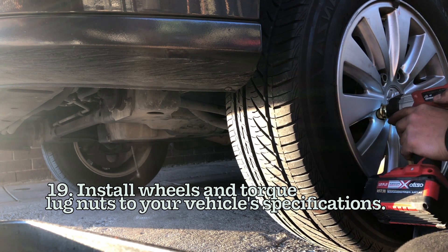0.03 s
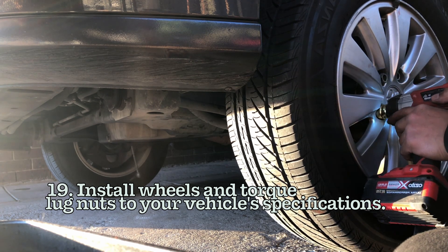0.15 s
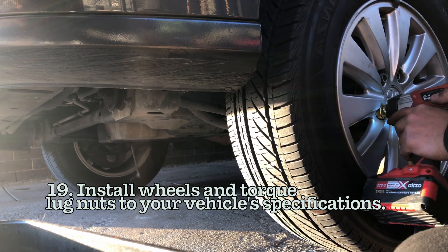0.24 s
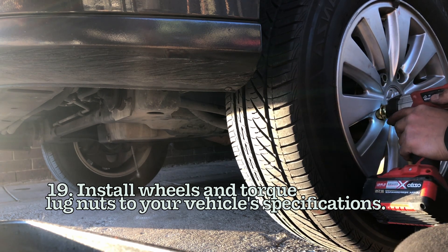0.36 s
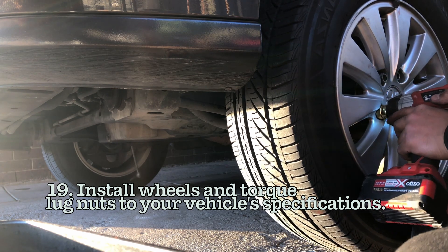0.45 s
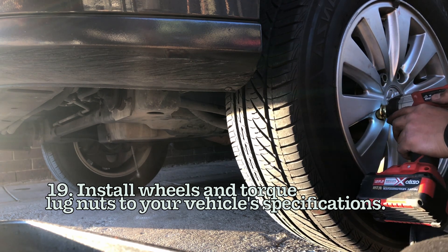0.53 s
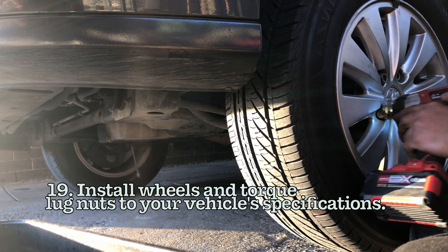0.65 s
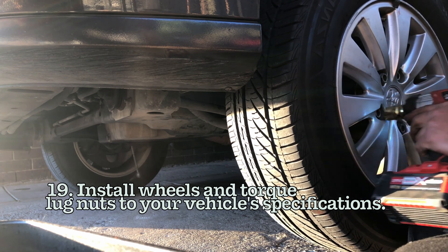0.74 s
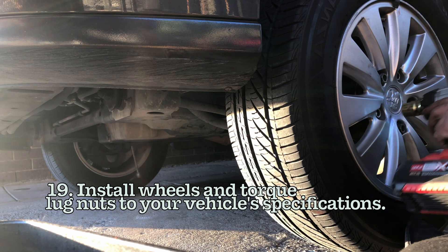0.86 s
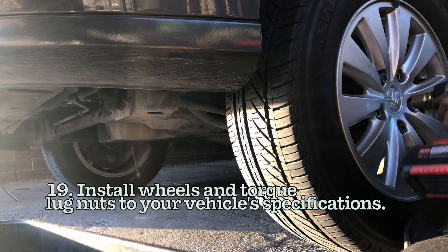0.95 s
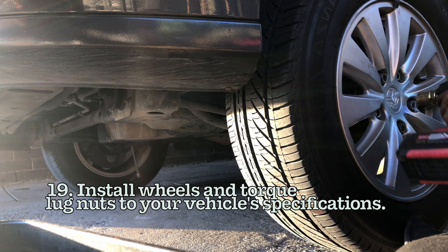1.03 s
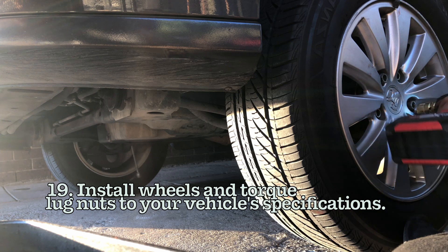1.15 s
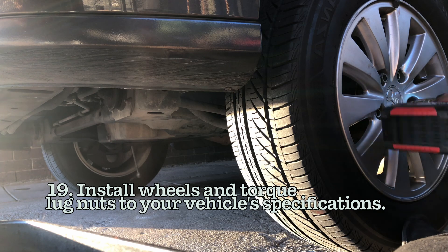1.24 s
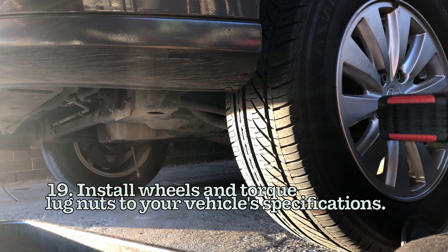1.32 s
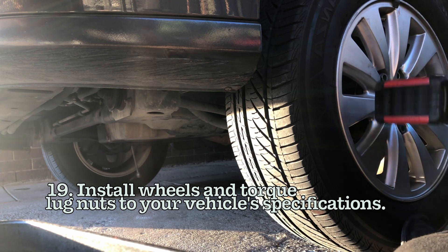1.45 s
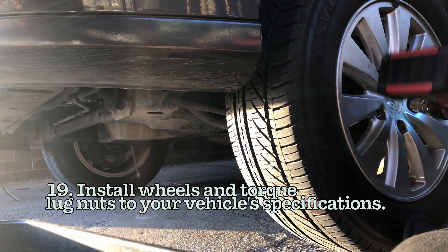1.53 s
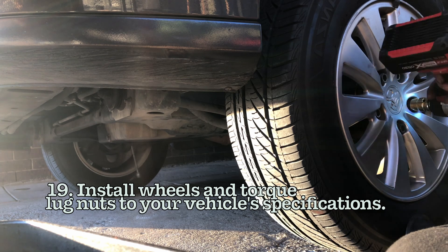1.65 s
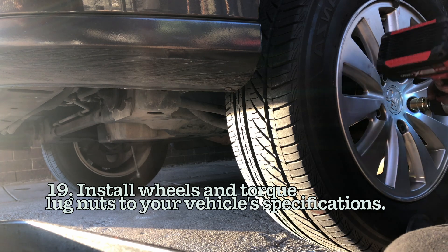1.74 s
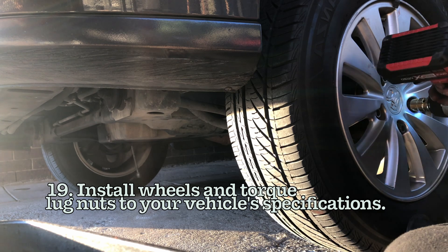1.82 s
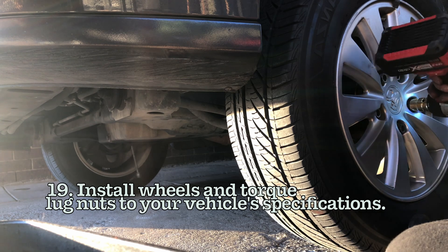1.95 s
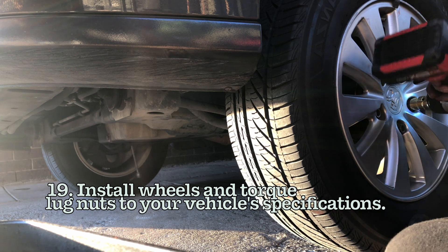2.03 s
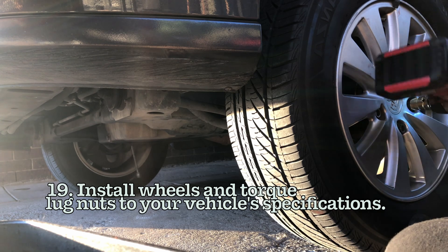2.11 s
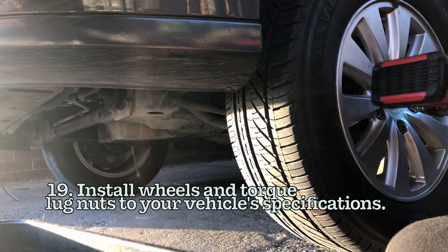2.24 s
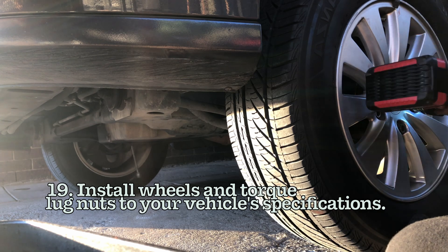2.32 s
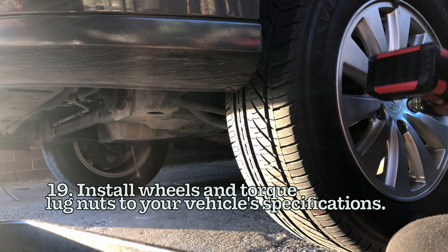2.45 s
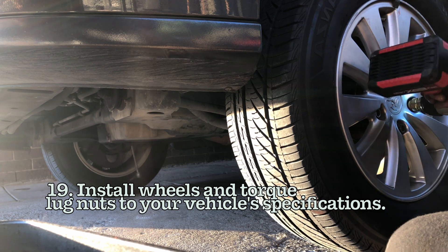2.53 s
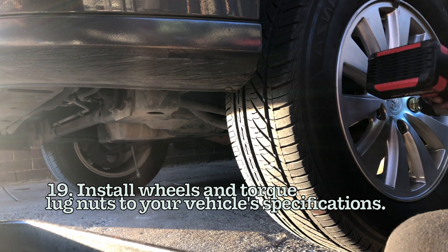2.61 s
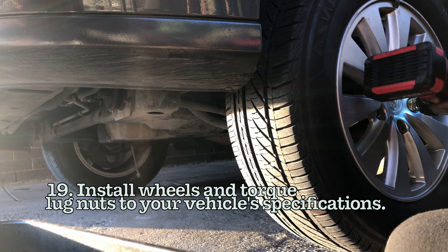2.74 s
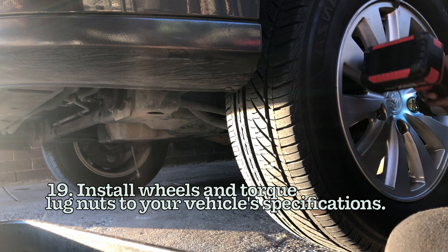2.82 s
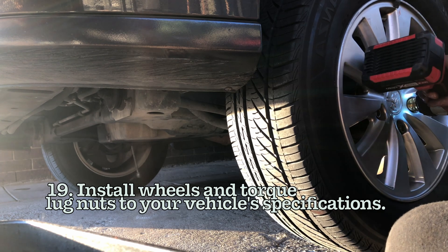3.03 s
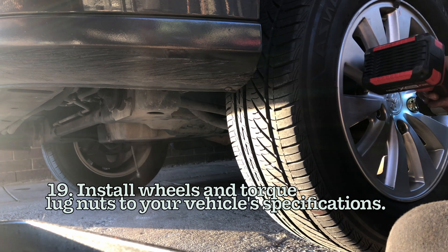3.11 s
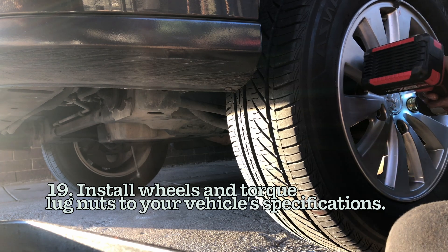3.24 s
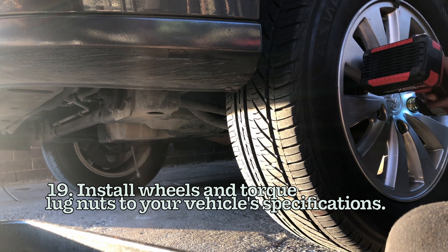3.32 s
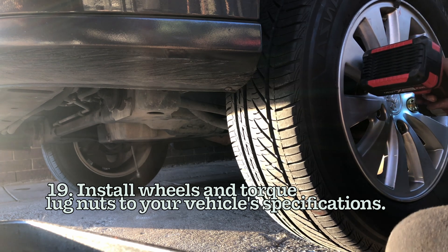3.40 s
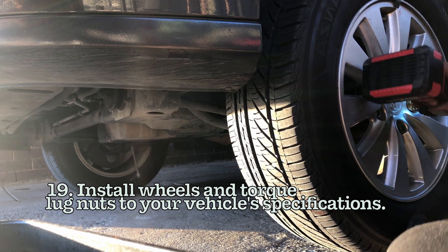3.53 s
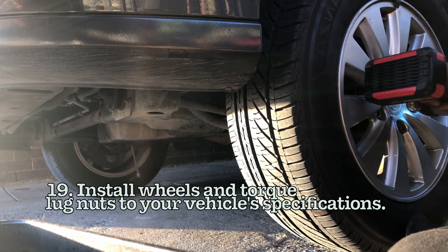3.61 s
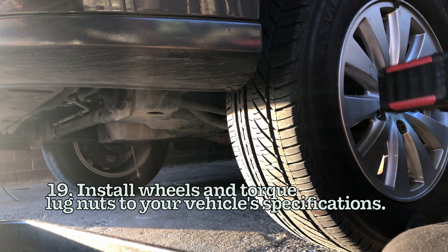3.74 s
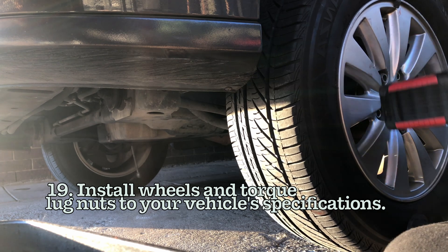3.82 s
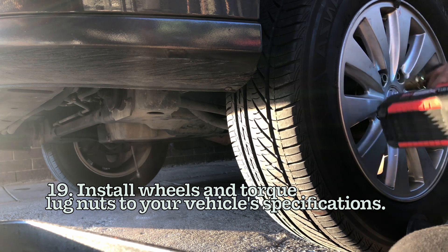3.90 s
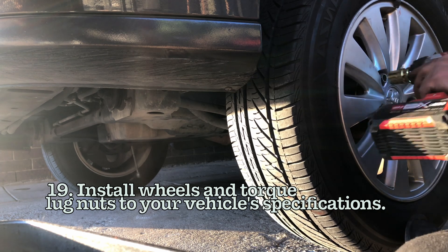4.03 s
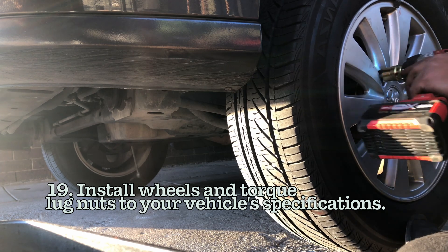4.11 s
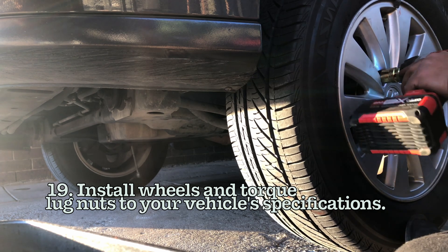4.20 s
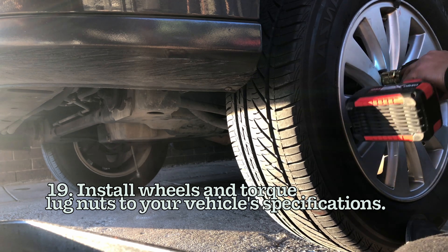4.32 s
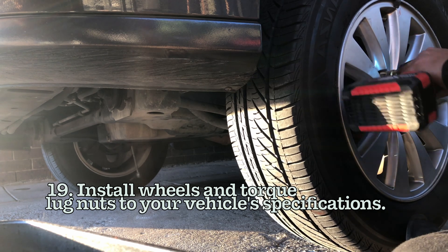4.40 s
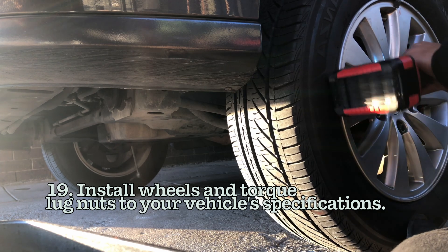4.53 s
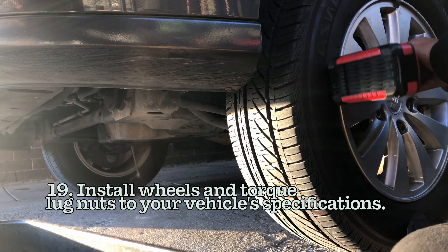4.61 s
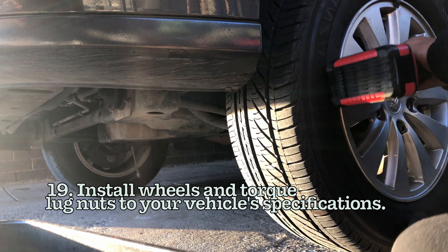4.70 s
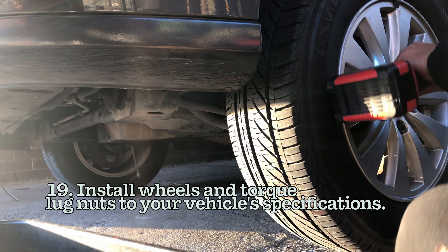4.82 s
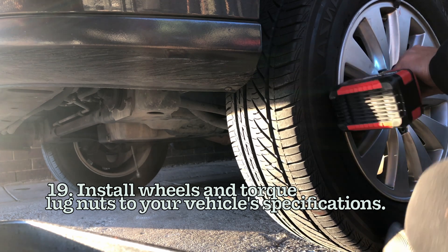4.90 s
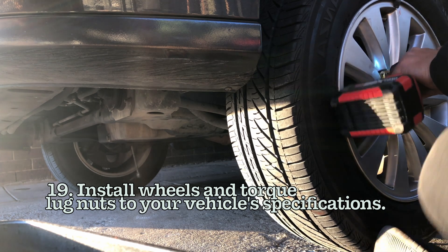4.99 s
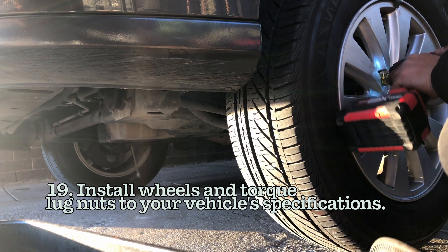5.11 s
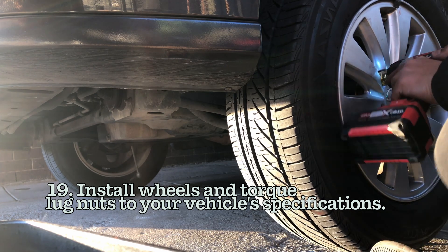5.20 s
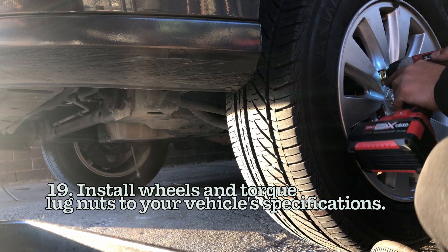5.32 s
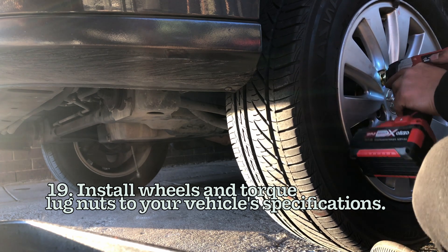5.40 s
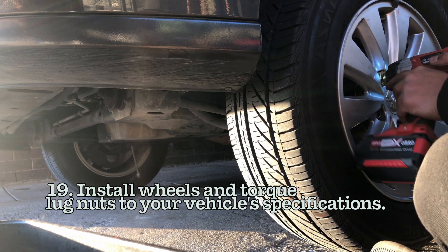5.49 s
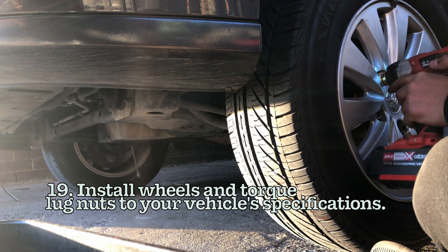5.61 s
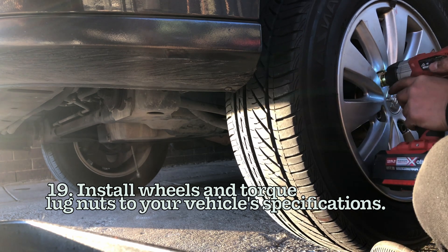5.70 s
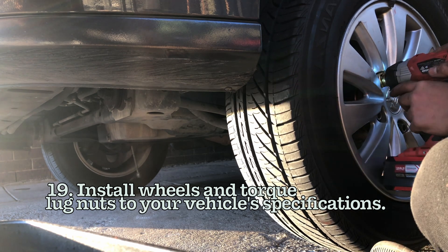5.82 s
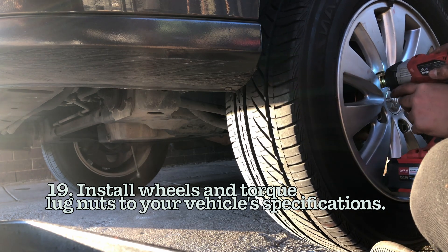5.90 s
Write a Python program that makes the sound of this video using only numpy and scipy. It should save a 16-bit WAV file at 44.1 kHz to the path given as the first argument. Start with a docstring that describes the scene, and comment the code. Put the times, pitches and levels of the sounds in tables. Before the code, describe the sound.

Three rapid, rattling bursts from a cordless impact driver on wheel nuts, separated by small metal clicks and rising motor whirs.

```python
"""A cordless impact driver tightens three wheel nuts in a garage, near a mono microphone.
The motor and gears whine up and the loose socket rattles on the nut; then the hammer strikes its anvil
about 59 times a second, exciting the resonances of tool and wheel. Some blows set off a low falling chirp.
Between nuts the socket clicks off and on. The garage reverberates over a faint rumble and hum."""
import sys
import numpy as np
from scipy import signal
from scipy.fft import rfft, irfft
from scipy.io import wavfile
from scipy.ndimage import uniform_filter1d

SR = 44100
rng = np.random.default_rng(int(sys.argv[2]) if len(sys.argv) > 2 else 0)


def int16_out(signal):
    """Quantize to a 16-bit WAV file."""
    q = np.round(np.clip(np.atleast_2d(signal).T, -1, 1) * 32767)
    wavfile.write(sys.argv[1], SR, q.astype(np.int16))


N = 262395
TIME = np.arange(N) / SR

# spectrum of a hard steel impact: frequency_hz, gain_db
IMPACT_SPECTRUM = [(70, -40), (130, -23.5), (260, -16), (400, -13), (600, -11.5), (1050, -9), (1450, -10),
                   (2100, -5.5), (2450, -2.5), (3500, -5.5), (4400, -6), (8000, -4), (12500, -3),
                   (15000, -2), (16000, -5.5)]
# spectrum of a light metal contact: frequency_hz, gain_db
CLICK_SPECTRUM = [(120, -21.5), (200, -2), (440, -10.5), (836, -11.5), (1560, -8.5), (1870, -2),
                  (2130, -6.5), (2800, -3), (3620, -9.5), (4270, -8.5), (7010, -11.5), (10100, -10),
                  (16000, -25)]


def hammer(blow_rates, blow_db, tilt_db, lift_s=.004, jitter_s=.00005, likeness=.3, light_grip_db=-38):
    """Impact excitation: the hammer knocks up its cam, then crashes on the anvil; the wheel's modes ring."""
    # envelope of cam friction, impact and decay: time_from_hit_s, level_db
    blow_shape = [(-.0075, -37), (-.004, -11.5), (-.0006, -10.5), (0, 2), (.001, -1.7), (.0028, -9.5),
                  (.006, -21), (.012, -35)]
    # free vibration of the wheel: pitch_hz, level_db, t60_s
    wheel_modes = [(133, -60.5, 1), (222.1, -67, 1.2), (296, -62, 1.1), (336, -48.5, .22),
                   (540, -57.5, 0.79), (693, -55, 0.17), (1104, -56.5, .2), (2781, -76, .9)]
    # damped knock of the hammer's lift: pitch_hz, bandwidth_hz, level_db
    cam_modes = [(340, 100, -1), (450, 600, -9), (1050, 130, -4.5), (1890, 150, -5)]
    # leaning on the tool couples more knock into the wheel: start_s, end_s, coupling_db
    leans = [(.03, .12, -35), (.42, .58, -32), (5.32, 5.6, -28.5)]
    times, rate = np.transpose(blow_rates)
    t = np.arange(times[0], times[-1], 1 / SR)
    count = np.cumsum(np.interp(t, times, rate)) / SR
    hits = np.interp(np.arange(int(count[-1]) + 1), count, t)
    hits += jitter_s * rng.standard_normal(len(hits))
    age, shape_db = np.transpose(blow_shape)
    envelope = amp(np.interp(np.arange(age[0], age[-1], 1 / SR), age, shape_db))
    ring_t = TIME[:SR]
    ring = sum(amp(db - 60 * ring_t / t60) * np.sin(2 * np.pi * hz * ring_t)
               for hz, db, t60 in wheel_modes)
    knock = sum(amp(db) * np.exp(-np.pi * width * ring_t) * np.cos(2 * np.pi * hz * ring_t)
                for hz, width, db in cam_modes)
    coupling = amp(light_grip_db) + swell(leans, rise_s=.059, fall_s=.12)
    crash, wheel = np.zeros((2, N))
    faces = np.sqrt(likeness) * rng.standard_normal(len(envelope))  # the same steel faces meet each time
    for hit in hits:
        force_db = blow_db + .7 * rng.standard_normal()
        grit = faces + np.sqrt(1 - likeness) * rng.standard_normal(len(envelope))
        add(crash, hit + age[0], amp(force_db) * envelope * grit)
        add(wheel, hit - lift_s, np.interp(hit, TIME, coupling) * knock + rng.standard_normal() * ring)
    return housing(colour(crash, IMPACT_SPECTRUM, tilt_db), gain_db=-2) + wheel


def motor(speeds, rasp_db, whine_db, buzz_db, seat_db, full_speed_hz=200, seat_s=.016):
    """Gear meshing: teeth whine and rasp at multiples of the rotor speed; the chopped supply buzzes."""
    # tones of the meshing teeth: rotor_multiple, level_db
    gear_orders = [(10, -14.5), (13, 3), (20, -13.5), (30, -5.5), (40, -9)]
    # spectrum of the gear rasp: frequency_hz, gain_db
    gear_spectrum = [(71, -45.5), (120, -13), (200, -21.5), (362, -12.5), (445, -21), (1400, -14.5),
                     (1900, -9), (2110, -18), (2530, -4), (3520, -11), (8140, -8), (15000, -14),
                     (16000, -12)]
    # the socket sits askew and chatters with the gears: start_s, end_s, level_db
    chatter_spans = [(4.845, 5.19, -25.5)]
    times, turns = np.transpose(speeds)
    t = np.arange(times[0], times[-1], 1 / SR)
    rotor_hz = np.interp(t, times, turns)
    speed = rotor_hz / full_speed_hz
    seating = amp(seat_db) * np.exp((t - times[-1]) / seat_s)  # grinding builds as the nut seats
    chatter = np.interp(t, TIME, swell(chatter_spans, rise_s=.011, fall_s=.06))
    rasp_gain = np.sqrt((amp(rasp_db) * speed) ** 2 + seating ** 2 + chatter ** 2)
    flare_db = 12 * np.exp(-((rotor_hz - 197.5) / 8) ** 2)  # the whine flares just below full speed
    whine_gain = speed ** 2.2 * amp(whine_db + flare_db)
    buzz_gain = amp(buzz_db - 6.5 * speed ** 2)  # the supply is chopped less at full speed
    drift, grit, chop = rng.standard_normal((3, len(t)))
    wobble = .007 * unit(uniform_filter1d(drift, size=200))
    angle = 2 * np.pi * np.cumsum(rotor_hz * (1 + wobble)) / SR
    mesh = sum(amp(db) * np.sin(k * angle) for k, db in gear_orders)
    whine = unit(housing(mesh, gain_db=-.5))
    # uneven teeth repeat their pattern at every turn
    shaft = sum(rng.standard_normal() * np.sin(k * angle + 2 * np.pi * rng.random())
                for k in range(5, 48))
    teeth = colour(unit(grit) + amp(-9) * unit(shaft), gear_spectrum)
    rasp = unit(housing(teeth, gain_db=-3.5))
    buzz = unit(resonate_twice(chop, hz=2810, width_hz=900))
    sound = rasp_gain * rasp + whine_gain * whine + buzz_gain * buzz
    return sound * signal.windows.tukey(len(t), .01)


def housing(x, gain_db):
    """Resonance: the tool's shell and socket reinforce the frequencies near their modes."""
    # modes of shell and socket: pitch_hz, bandwidth_hz, gain_db
    modes = [(1756, 120, -2), (2372, 83, 2.5), (2660, 76, -20), (4650, 890, -5.5)]
    return x + amp(gain_db) * sum(amp(db) * resonate(x, hz, width) for hz, width, db in modes)


def chirps(first_period_s=.000403, stretch=.76, blows_per_s=59.5, fade_db_per_s=55):
    """Dispersion, as in a bending wave: the treble comes first and each period is longer, a low "pew"."""
    # envelope of one chirp: age_s, amplitude
    shape = [(0, 0), (.0003, 0.61), (.003, 1), (.007, 0.38), (0.01, .45), (0.016, 1), (.019, 0)]
    # fading runs at the pace of the blows: start_s, first_level_db, chirp_count, spacing_blows
    runs = [(0.263, -30, 2, 3), (2.8463, -29, 2, 2), (2.933, -27, 1, 1), (2.9669, -16, 5, 1),
            (3.069, -15, 4, 1), (3.154, -17, 2, 1), (3.221, -16, 5, 1), (3.3228, -19.5, 2, 2),
            (3.39, -16.5, 2, 1), (3.4575, -29, 2, 2), (4.559, -27.5, 1, 1), (5.6824, -25.5, 1, 1),
            (5.7325, -12, 3, 2), (5.8319, -10.5, 2, 1)]
    age, size = np.transpose(shape)
    t = TIME[:int(age[-1] * SR)]
    cycles = np.cumsum(1 / (first_period_s + stretch * t)) / SR
    wave = np.sin(2 * np.pi * cycles - 1.2) * np.interp(t, age, size)
    out = np.zeros(N)
    for start, db, count, step in runs:
        for blow in np.arange(round(count)) * round(step):
            delay = blow / blows_per_s
            direction = (-1) ** ((blow + 1) // 2)  # the kick reverses every second blow
            add(out, start + delay, direction * amp(db - fade_db_per_s * delay) * wave)
    return butterworth(out, 1, hz=25, side="high")


def squeaks(overtone_db=-32):
    """Forced vibration: a few pulses of current make the stalled motor sing."""
    # touches of the trigger: start_s, level_db, pitch_hz, length_s
    touches = [(2.076, -38.5, 2800, 0.0078), (2.445, -16, 2592, 0.0081), (4.723, -31, 2660, 0.01)]
    out = np.zeros(N)
    for start, db, hz, length in touches:
        phase = 2 * np.pi * hz * TIME[:int(length * SR)]
        tone = np.sin(phase) + amp(overtone_db) * sum(np.sin(k * phase) for k in range(2, 5))
        add(out, start, amp(db) * tone * signal.windows.tukey(len(tone), .7))
    return out


def rattles():
    """Backlash: the loose socket knocks on the spinning nut and excites the housing."""
    # knocks of the socket: start_s, relative_db
    knocks = [(.081, -13), (2.464, -16), (4.737, -22.5), (4.875, -6.5), (4.913, -6), (4.955, -8),
              (4.963, -5), (5.025, -7), (5.042, -12), (5.069, -4.5), (5.094, -2.5), (5.114, -8.5),
              (5.134, -10.5), (5.156, -6), (5.183, -8)]
    out = np.zeros(N)
    for start, db in knocks:
        add(out, start, amp(db - 4) * burst(decay_s=.003, rise_share=.41))
    return housing(colour(out, IMPACT_SPECTRUM), gain_db=-8)


def clicks(treble_hz=5000):
    """Brief contacts have broad spectra: the socket clicks against nuts and rim."""
    # touches of the socket: start_s, relative_db, treble_over_middle_db, decay_s
    touches = [(0.961, -56.5, 11.5, .0019), (1.238, -28.5, 1, 0.0035), (1.396, -35, 3, 0.0089),
               (1.498, -48.5, -14, 0.0028), (1.569, -51, -6, 0.0026), (2.058, -44.5, -1, .0025),
               (2.134, -49, -14, .005), (2.216, -34, 3, 0.0084), (2.234, -26.5, -4, 0.0081),
               (2.252, -21, -1.5, 0.0065), (2.419, -35.5, -15, 0.001), (3.521, -21, 6, 0.0026),
               (3.688, -42.5, 1.5, .0021), (4.094, -61.5, 1.5, .002), (4.225, -32, 6, 0.0036),
               (4.308, -35.5, -20, 0.0062), (4.345, -42, -15, 0.0066), (4.456, -43, -11, 0.0081),
               (4.479, -38.5, -16, 0.0061), (4.561, -41, 0.5, 0.011), (5.364, -13.5, 3, 0.0031)]
    out = np.zeros(N)
    for start, db, treble_db, decay in touches:
        touch = burst(decay, rise_share=.2)
        middle = butterworth(touch, 1, treble_hz, "low")
        add(out, start, amp(db - 3) * (middle + amp(treble_db) * (touch - middle)))
    return colour(out, CLICK_SPECTRUM)


def clinks_and_bumps():
    """Damped resonance: light contacts ring briefly, high in the socket and low in the handled tool."""
    # the socket rings against a nut: start_s, level_db, pitch_hz
    clinks = [(1.598, -61.5, 3100), (1.802, -55.5, 2260)]
    # dull, hollow handling bumps: start_s, relative_db, pitch_hz, decay_s
    bumps = [(1.24, -49, 450, .0097), (1.399, -49.5, 655, 0.011), (1.789, -53.5, 129, 0.02),
             (2.253, -44, 330, 0.021), (4.37, -44, 122, .02), (4.445, -45.5, 170, 0.0097),
             (4.54, -40.5, 229, 0.012), (4.558, -30, 463, 0.0037), (4.561, -28.5, 220, 0.0058),
             (4.746, -41, 175, 0.013), (5.345, -45.5, 98, .021)]
    out = np.zeros(N)
    for start, db, hz in clinks:
        add(out, start, amp(db) * ringing(burst(.0091, rise_share=.18), hz, width_hz=650))
    for start, db, hz, decay in bumps:
        add(out, start, amp(db - 2) * ringing(burst(decay, rise_share=.9), hz, width_hz=.63 * hz))
    return out


def handling(ticks_per_s=70, spread_db=2.5, tick_s=.005):
    """Structure-borne noise: the shifted tool rumbles, and the socket ticks as it feels for the nut."""
    # moves to the next nut: start_s, end_s, rumble_db, ticking_db
    moves = [(1.753, 2.798, -60, -69.5), (4.147, 4.663, -51, -61.5)]
    # spectrum of the handling rumble: frequency_hz, gain_db
    rumble_spectrum = [(25, -30), (60, 3), (130, 1.5), (250, -8), (600, -14), (1100, -20.5), (2000, -34.5),
                       (16000, -74.5)]
    start, end, rumble_db, tick_db = np.transpose(moves)
    rumble = colour(rng.standard_normal(N), rumble_spectrum, size=8192)
    touches = rng.random(N) < ticks_per_s / SR
    strength = amp(spread_db * np.minimum(rng.exponential(1, N), 4))
    scraping = signal.lfilter([1], [1, -np.exp(-1 / (tick_s * SR))], touches * strength)
    ticks = unit(colour(scraping * rng.standard_normal(N), CLICK_SPECTRUM))
    return (rumble * swell(zip(start, end, rumble_db), rise_s=.067, fall_s=.2)
            + ticks * swell(zip(start, end, tick_db), rise_s=.32, fall_s=.1))


def garage(x, first_echo_s=.004):
    """Reverberation: dense reflections from car, floor and walls decay exponentially, the treble first."""
    # reverberation time: frequency_hz, t60_s
    decay_times = [(100, .4), (500, 0.37), (1500, 0.39), (4000, 0.38), (8000, 0.3), (15000, .18)]
    # reflected against direct sound: frequency_hz, level_db
    echo_levels = [(100, -21.5), (500, 0), (2500, -10), (6000, -10), (15000, -14)]
    hz, t, noise = signal.stft(rng.standard_normal(SR // 2), SR, nperseg=256)
    t60 = at_frequency(decay_times, hz)[:, None]
    decay = np.exp(-np.log(1000) * t / t60) * np.sqrt(2 * np.log(1000) / (t60 * SR))
    gain = amp(at_frequency(echo_levels, hz))[:, None]
    tail = signal.istft(noise * decay * gain, SR, nperseg=256)[1]
    wet = np.zeros(N)
    add(wet, first_echo_s, signal.oaconvolve(x, tail))
    return wet


def background(split_hz=95, rumble_db=-63.5, wash_db=-54, sink_s=.37, recover_db_per_s=6.5):
    """Band-limited noise: a low rumble, a dull distant wash and a narrow band heard as a wavering hum."""
    # spectrum of the ambient noise: frequency_hz, gain_db
    spectrum = [(18, -48), (30, -26.5), (59, 0.5), (95, -3.5), (124, -1), (233, -13), (266, -14.5),
                (364, -12.5), (1860, -28.5), (2230, -33), (3490, -36.5), (8080, -44), (16000, -47)]
    # the background sinks under each run of blows and creeps back: start_s, end_s, depth_db
    dips = [(0, .7, 10.5), (2.8, 3.7, 15.5), (5, 5.946, 7)]
    low, high = (colour(rng.standard_normal(N), spectrum, size=8192) for _ in range(2))
    rumble = unit(butterworth(low, 2, split_hz, "low"))
    wash = unit(butterworth(high, 2, split_hz, "high"))
    hum = amp(-3) * unit(resonate_twice(rng.standard_normal(N), hz=118.8, width_hz=20))
    dip_db = np.zeros(N)
    for start, end, depth in dips:
        corners = [start, start + sink_s, end, end + depth / recover_db_per_s]
        dip_db = np.maximum(dip_db, np.interp(TIME, corners, [0, depth, depth, 0]))
    return (amp(rumble_db) * rumble + amp(wash_db) * (wash + hum)) * amp(-dip_db)


def burst(decay_s, rise_share):
    """A dense cluster of contacts sums to noise that builds quickly and decays exponentially."""
    t = TIME[:int(8 * decay_s * SR) + 2]
    envelope = np.exp(-t / decay_s) * (1 - np.exp(-t / (rise_share * decay_s)))
    return rng.standard_normal(len(t)) * envelope / envelope.max()


def resonate(x, hz, width_hz):
    """A second-order resonance of peak gain 1."""
    return signal.lfilter(*signal.iirpeak(hz, hz / width_hz, fs=SR), x)


def resonate_twice(x, hz, width_hz):
    """Two equal resonances in cascade give steeper skirts."""
    return resonate(resonate(x, hz, width_hz), hz, width_hz)


def ringing(x, hz, width_hz):
    """Resonance scaled so that the noise power passed does not depend on bandwidth."""
    return np.sqrt(SR / width_hz) * resonate_twice(x, hz, width_hz)


def butterworth(x, order, hz, side):
    """A maximally flat low-pass or high-pass filter."""
    return signal.lfilter(*signal.butter(order, hz, side, fs=SR), x)


def colour(x, spectrum, tilt_db=0, size=2048):
    """A minimum-phase filter of unit energy; tilt_db is per octave."""
    hz = np.fft.rfftfreq(size, 1 / SR)
    log_gain = np.log(amp(at_frequency(spectrum, hz) + tilt_db * np.log2(hz + 20)))
    causal_cepstrum = irfft(log_gain)[:size // 2] * np.r_[1, np.full(size // 2 - 1, 2)]
    taps = irfft(np.exp(rfft(causal_cepstrum, size)))
    return signal.oaconvolve(x, taps / np.linalg.norm(taps))[:len(x)]


def swell(spans, rise_s, fall_s):
    """Trapezoidal envelopes: each start_s, end_s, level_db rises, holds and falls away."""
    return sum(amp(db) * np.clip((TIME - start) / rise_s, 0, 1) * np.clip(1 - (TIME - end) / fall_s, 0, 1)
               for start, end, db in spans)


def at_frequency(points, hz):
    """Interpolation on a log-frequency axis."""
    frequency, value = np.transpose(points)
    return np.interp(np.log(hz + 1), np.log(frequency), value)


def amp(db):
    """Decibels to amplitude ratio."""
    return 10 ** (np.asarray(db) / 20)


def unit(x):
    """Normalisation to rms 1."""
    return x / np.sqrt(np.mean(x ** 2) + 1e-20)


def add(mix, start_s, sound):
    """Superposes a sound on the mix."""
    part = mix[max(round(start_s * SR), 0):][:len(sound)]
    part += sound[:len(part)]


def scene():
    """Superposition of tool, reflections and background, alike in both channels."""
    # pace of the hammer, one table a nut: time_s, blows_per_s
    blow_rates = [
        [(.083, 49.28), (.157, 56.13), (.23, 58.74), (.328, 59.22), (.573, 59.39)],
        [(2.795, 58.03), (3.011, 58.7), (3.191, 59.43), (3.516, 58.98)],
        [(5.297, 59.58), (5.428, 59.44), (5.69, 60.07), (5.952, 61.54)],
    ]
    # force and brightness of the blows, one row a nut: relative_db, tilt_db_per_octave
    nuts = [(-13.5, 0.31), (-15.5, 0.7), (-12.5, 0.28)]
    # rotor speed, one table a spin-up: time_s, turns_per_s
    rotor_speeds = [
        [(0, 191), (.03, 197), (.058, 200), (.084, 141)],
        [(2.445, 9.6), (2.5, 49.6), (2.58, 96), (2.64, 155), (2.72, 195), (2.745, 199), (2.765, 200),
         (2.778, 193), (2.796, 180)],
        [(4.725, 10), (4.83, 71), (4.94, 125), (5.03, 161), (5.12, 182), (5.17, 195), (5.205, 184),
         (5.297, 154)],
    ]
    # base levels of the motor's noises, one row a spin-up: rasp_db, whine_db, buzz_db, seating_db
    motor_levels = [(-20, -34, -51, -12.5), (-22.5, -31.5, -32, -12.5), (-28, -34.5, -37, -36)]
    tool = rattles() + clicks() + clinks_and_bumps() + handling() + squeaks()
    for rates, nut in zip(blow_rates, nuts):
        tool += hammer(rates, *nut)
    for speeds, levels in zip(rotor_speeds, motor_levels):
        add(tool, start_s=speeds[0][0], sound=motor(speeds, *levels))
    mono = amp(-1.64) * (tool + garage(tool)) + chirps() + background()
    return np.tile(mono, (2, 1))


def record(dry, ceiling=.89, edge_hz=16000):
    """Soft saturation rounds off the sharpest peaks; a low-pass filter then limits the band."""
    rounded = ceiling * np.tanh(dry / ceiling)
    taps = signal.firwin(511, edge_hz, window=("kaiser", 9), fs=SR)
    return signal.oaconvolve(rounded, taps[None], "same")


dry = scene()
out = record(dry)
int16_out(out)
```